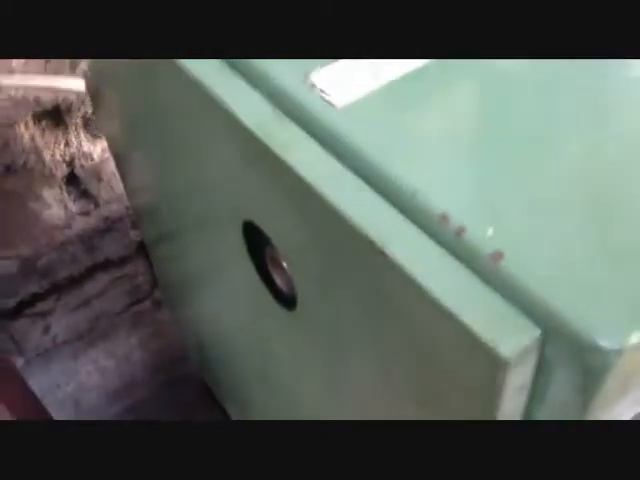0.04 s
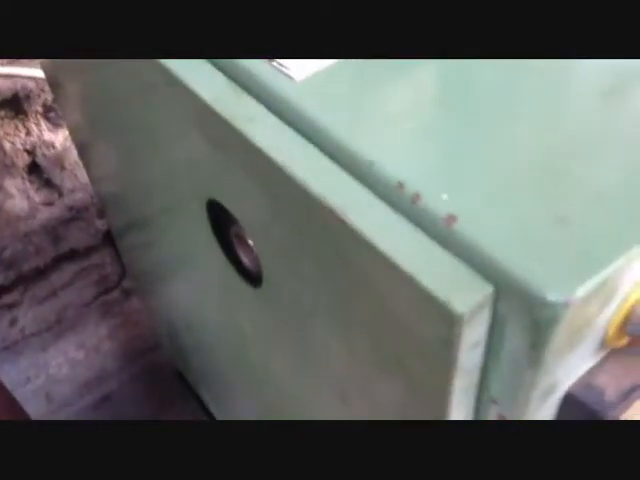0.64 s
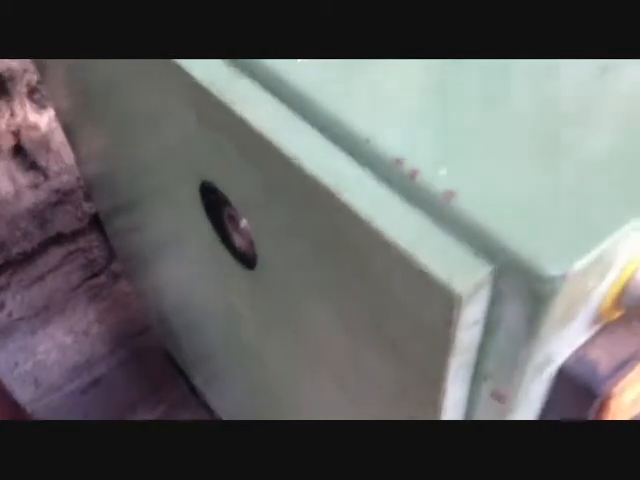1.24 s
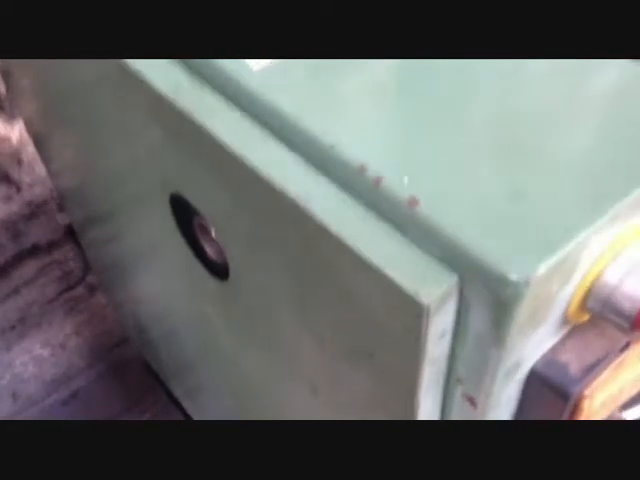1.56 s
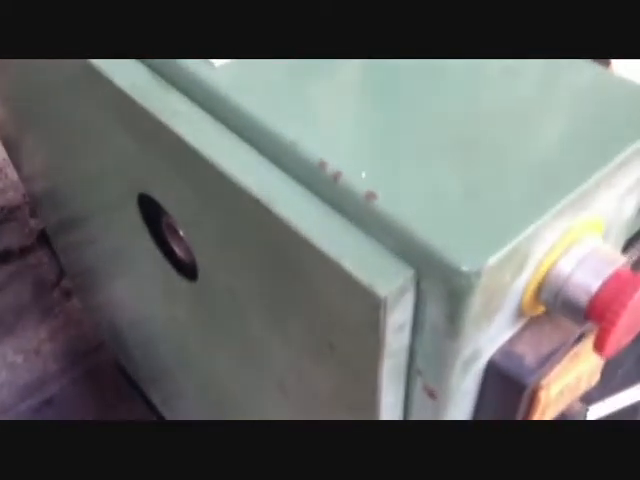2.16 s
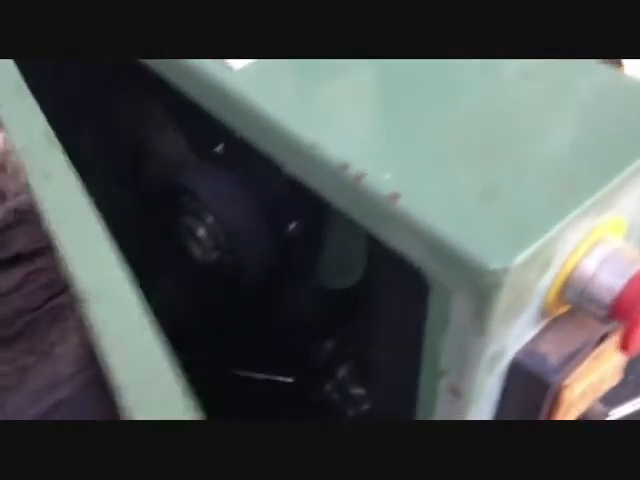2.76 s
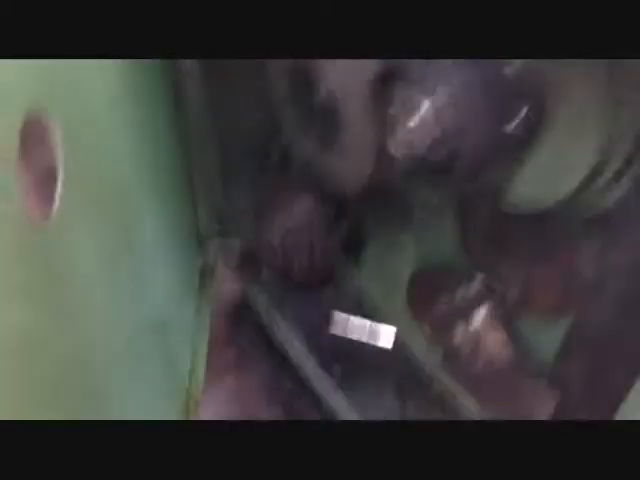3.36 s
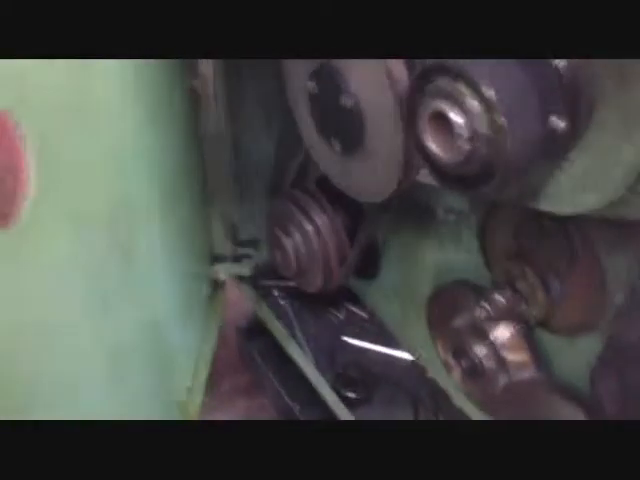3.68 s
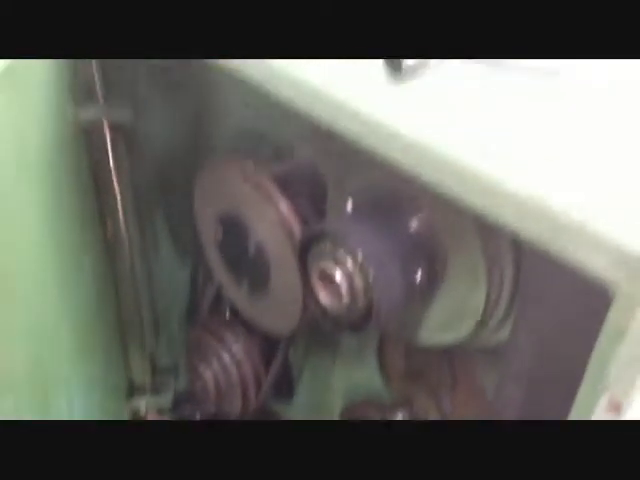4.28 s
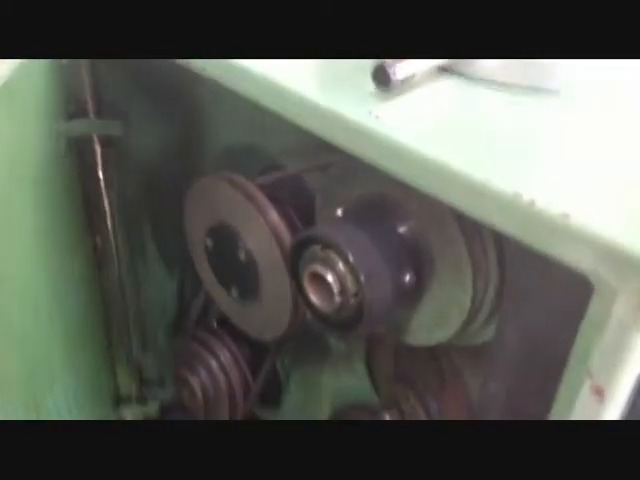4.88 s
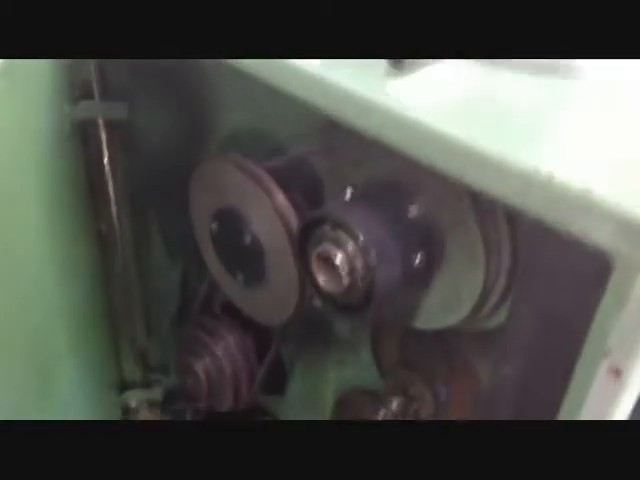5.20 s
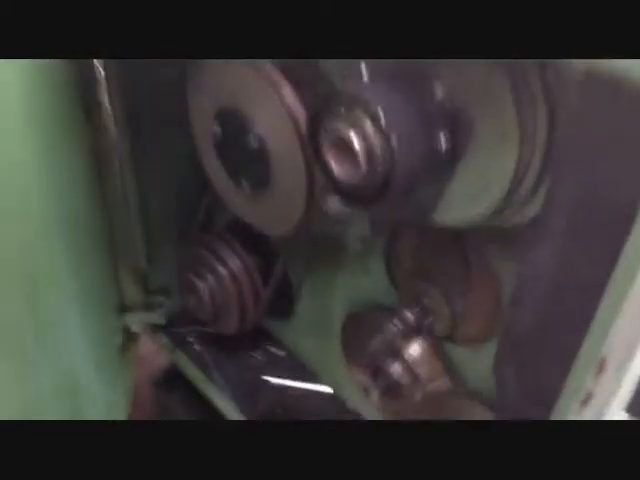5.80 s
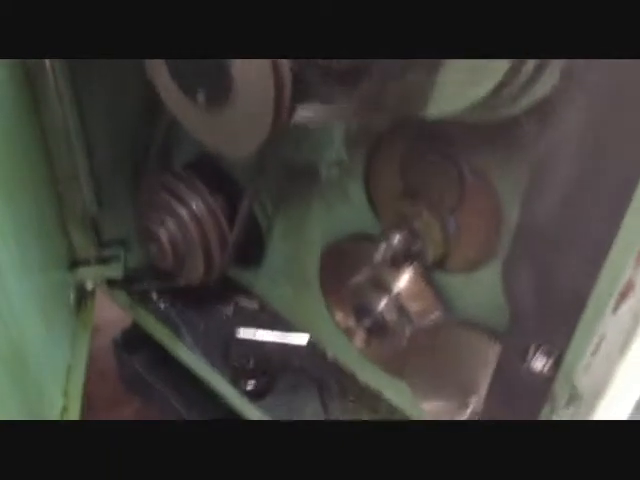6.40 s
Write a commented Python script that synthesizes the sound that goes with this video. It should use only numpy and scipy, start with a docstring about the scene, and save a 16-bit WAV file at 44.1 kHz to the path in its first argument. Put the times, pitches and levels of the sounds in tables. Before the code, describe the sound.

Sharp metal latch clicks and hollow knocks, a loud clack as an iron cabinet door opens, then a dull, bouncing thud in a quiet workshop.

```python
"""Over a low hum and hiss, a hand brushes paint and the steel catch of a machine cabinet clicks.
The heavy iron door is worked loose in a quiet workshop: at each tug the catch cracks and pings, and
the door booms in its low modes. The catch drags free with a loud clack; the door swings open and
judders against its hinge stop in ever quicker, weaker bounces. Faint chirps sound far off."""
import sys
import numpy as np
from scipy import signal
from scipy.fft import rfft, irfft, next_fast_len
from scipy.io import wavfile

SR = 44100
rng = np.random.default_rng(int(sys.argv[2]) if len(sys.argv) > 2 else 0)


def put_to_file(sound):
    """Save the sound as 16-bit audio at rate SR, in the file named by the first command-line argument."""
    columns = np.atleast_2d(sound).T  # one column per channel
    safe = np.clip(columns, -1, 1)
    whole_steps = np.round(safe * 32767)
    wavfile.write(sys.argv[1], SR, whole_steps.astype(np.int16))


N = 284445
RING_SIZE = 32768
TIME, RING_TIME = np.arange(N) / SR, np.arange(RING_SIZE) / SR

# room tone: (frequency [Hz], relative level [dB])
AIR_EQ = [(15, -47), (25, -12), (69, -20), (86, -18), (173, -1.5), (198, -12.5), (253, -4), (313, -17.5),
          (378, -12.5), (537, -19), (741, -21), (1410, -22), (1620, -22.5), (3340, -24.5), (15500, -31.5)]
# hum partials: (frequency [Hz], level [dB])
HUM_TONES = [(103, -75.5), (145, -69), (172, -67), (257, -74), (344, -76.5), (371, -83.5), (1373, -85),
             (1464, -82)]
# far chirps: (time [s], length [s], start pitch [Hz], end pitch [Hz], level [dB])
FAR_CHIRPS = [(0.356, 0.15, 3125, 3740, -69), (2.323, 0.22, 3800, 3080, -66.5),
              (3.379, .14, 3647, 3200, -66), (4.29, 0.2, 3730, 2985, -71.5),
              (5.952, 0.12, 3050, 3620, -68.5)]
# workshop reverb: (frequency [Hz], relative level [dB])
REVERB_EQ = [(100, -9.5), (200, -13), (450, -20), (750, -6), (1300, -16.5), (3000, -18.5), (6000, -19),
             (15000, -21)]
# decay of the reverb, the hard clang and the blunt clang: (frequency [Hz], t60 [s])
REVERB_DECAY = [(120, 0.93), (300, 1), (700, 0.36), (1500, 0.61), (3500, 0.41), (8000, 0.34), (15000, 0.22)]
HARD_DECAY = [(300, 0.15), (1000, 0.18), (2000, 0.15), (4000, 0.064), (8000, 0.12), (15000, 0.062)]
BLUNT_DECAY = [(150, 0.17), (700, 0.56), (1500, 0.26), (3000, 0.16), (10000, 0.27)]
# hand strokes: (time [s], length [s], level [dB])
HAND_STROKES = [(0.08, 0.25, -65.5), (0.926, 0.22, -67.5), (2.063, 0.22, -71), (3.017, 0.2, -67.5),
                (5.453, 0.42, -74)]
# tone of hand, drag, click, hard clang and blunt clang: (frequency [Hz], relative level [dB])
HAND_EQ = [(400, 22), (1500, -11), (3500, 13.5), (6000, 5), (9500, 9), (15000, -8)]
DRAG_EQ = [(500, 7), (2000, -4), (4000, -5), (7000, -2), (11000, -1), (15500, -16)]
CLICK_EQ = [(200, 3.5), (800, 8), (2000, -12), (3600, -11), (5200, -3), (6500, 1), (9500, -3),
            (12000, -10.5), (15500, -26)]
HARD_EQ = [(150, -15), (400, 8.5), (750, 3), (1000, -3), (1500, 0), (2300, -2), (3400, 0.5), (5000, -7.5),
           (6500, -21), (10000, -21.5), (15000, -73)]
BLUNT_EQ = [(70, -17), (140, 7), (300, 7.5), (700, -4), (1100, -8.5), (1700, -12), (2800, -14), (4200, -29),
            (7000, -40), (15000, -52)]
# modes of the catch, the latched door and the open door: (frequency [Hz], relative level [dB], t60 [s])
PING_MODES = [(1112, -8.5, .17), (1338, -6, 0.083), (1532, -2, 0.13), (1846, -1, 0.054), (2490, 3, 0.048),
              (2640, -25, 0.091), (2985, -6.5, 0.098), (3250, -5.5, 0.051), (3543, 2, 0.051),
              (3820, -3, 0.069), (4044, 0, 0.049), (4470, 7.5, 0.019), (5000, 3, 0.048), (5290, 0.5, 0.057)]
LATCHED_MODES = [(135.6, -19, 0.27), (177.5, -6, 0.16), (213, -6, 0.13), (266.8, -7, 0.19),
                 (294.3, -4, 0.15), (328.7, -8.5, 0.23), (377.6, -2, 0.17), (408.5, -15, 0.38),
                 (451.2, -1, 0.18), (463.6, -2.5, 0.15), (542, -19.5, 0.28), (598, -18.5, 0.23),
                 (630, -16, 0.27), (667, -19.5, 0.25), (709.8, -10, 0.15), (840, -25.5, 0.33),
                 (920, -26, 0.077), (1158, -26, 0.11)]
OPEN_MODES = [(131.8, -12, 0.45), (184.5, -11, .22), (237, -9, 0.12), (269, 0.5, 0.16), (310, -3, 0.2),
              (341, -5, 0.55), (445.3, -9.5, 0.78), (484, -18, .24), (526, -6.5, 0.44), (577, -8.5, 0.53),
              (606, -15, 0.22), (649, -9, 0.43), (707, -5.5, 0.23), (760, -13.5, 0.41), (770, -16, .34),
              (884, -17, 0.37), (1010, -15, 0.17), (1132, -2.5, 0.22), (1187, -8.5, 0.2), (1420, -18, 0.28),
              (1450, -16, 0.25), (1890, -32, 0.16), (2415, -16, 0.21), (2730, -26, 0.12)]
# the catch scrapes over its keeper: (time [s], length [s], level [dB], tilt [dB/octave])
CATCH_DRAGS = [(2.445, 0.02, -34, -.5), (2.485, 0.023, -33, 0.5)]
# catch contacts: (time [s], click [dB], clang [dB], clang tilt [dB/octave], favoured ping [Hz])
CATCH_HITS = [(0.430, -58.5, -61, 2, 5270), (0.6933, -38.5, -53.5, 2, 4340), (0.700, -43, -53, 5, 4370),
              (1.421, -38, -32, -2.5, 1800), (1.6303, -40.5, -38.5, -0.5, 3580),
              (1.721, -43.5, -37, -4.5, 3000), (1.7856, -51, -51.5, 4, 3250),
              (1.8207, -26.5, -33.5, -0.5, 3400), (1.8445, -40.5, -33, -3.5, 2400),
              (1.997, -58, -61, 7, 3260), (2.085, -56, -53.5, 5.5, 5400), (2.4424, -30.5, -36, -4, 5200),
              (2.4467, -27.5, -27.5, 5, 3500), (2.457, -33, -24.5, 4, 3200), (2.4645, -24, -24, 2, 2820),
              (2.4772, -25, -24.5, 3, 4470), (2.488, -31, -30, -0.5, 2470), (3.151, -59.5, -57, -6, 5170),
              (6.1458, -57.5, -63.5, 3, 4420)]
# the door jolts on its hinges: (time [s], level [dB], favoured frequency [Hz], boost there [dB])
DOOR_JOLTS = [(0.440, -58.5, 330, -2), (0.7053, -36.5, 199, 7.5), (1.402, -48, 390, 8),
              (1.429, -35, 350, 2), (1.507, -47.5, 353, 8), (1.633, -24.5, 260, 6.5), (1.669, -35, 440, 24),
              (1.7204, -29.5, 377, 5.5), (1.79, -28, 229, 7.5), (1.829, -19.5, 546, 11),
              (2.445, -23.5, 380, 4.5), (2.4573, -17, 340, 1.5), (2.508, -29, 255, 13),
              (2.924, -61, 950, 35), (3.127, -45, 252, 15.5), (6.125, -63.5, 806, 20)]
# the open door meets its stop: (time [s], ring [dB], clang [dB], favoured frequency [Hz])
STOP_HITS = [(3.629, -46.5, -50.5, 362), (3.819, -51.5, -48, 352), (3.849, -25.5, -25.5, 636)]


def from_db(db):
    return 10 ** (np.asarray(db) / 20)


def rms(x):
    return np.sqrt(np.mean(x ** 2) + 1e-20)


def at_hz(points, hz):
    """Read a table on a log-frequency axis."""
    f, value = np.transpose(points)
    return np.interp(np.log(np.maximum(hz, 1)), np.log(f), value)


def add(out, s, sound):
    """Mix a sound in at time s."""
    i = max(round(s * SR), 0)
    out[i:i + len(sound)] += sound[:N - i]


def at_level(sound, db, size):
    """Scale a sound so that its first `size` samples have the given rms level."""
    return sound * from_db(db) / rms(sound[:size])


def drift(rate):
    """Random modulator that glides to a new value `rate` times a second."""
    knots = rng.standard_normal(N // 100)
    return np.interp(TIME * rate, np.arange(len(knots)), knots)


def colour(x, eq, tilt_db=0):
    """Minimum-phase EQ, tilted per octave: nothing rings ahead of an attack."""
    size = 2 * next_fast_len(len(x) // 2 + 2048)
    hz = np.maximum(np.fft.rfftfreq(size, 1 / SR), 20)
    gain = from_db(at_hz(eq, hz) + tilt_db * np.log2(hz / hz.mean()))
    cepstrum = irfft(np.log(gain))
    cepstrum[1:size // 2] *= 2
    cepstrum[size // 2 + 1:] = 0
    return irfft(rfft(x, size) * np.exp(rfft(cepstrum)))[:len(x)]


def dying_noise(decay, size=16384):
    """Countless modes struck at once; each band dies at its own rate."""
    white, hz = rfft(rng.standard_normal(size)), np.fft.rfftfreq(size, 1 / SR)
    centres, t60s = np.transpose(decay)
    shares = [at_hz(np.c_[centres, row], hz) for row in np.eye(len(centres))]
    bands = [irfft(white * share, size) for share in shares]
    return sum(band * from_db(-60 * RING_TIME[:size] / t60) for band, t60 in zip(bands, t60s))


def ring(modes, favoured_hz, boost_db, octaves=0.39, scatter_db=1.0, split=0.0238, twin_db=-5):
    """One blow: the point of contact favours some modes; each beats with a weaker twin close by."""
    hz, db, t60 = np.transpose(modes)[:, :, None]
    nearness = np.exp(-(np.log2(hz / favoured_hz) / octaves) ** 2)
    strength = from_db(db + boost_db * nearness + scatter_db * rng.standard_normal(hz.shape))
    twin_hz = hz * (1 + split * rng.uniform(-1.12, 1, hz.shape))
    main, twin = (np.sin(2 * np.pi * (f * RING_TIME + rng.random(hz.shape))) for f in (hz, twin_hz))
    fade = from_db(-60 * RING_TIME / t60)
    return np.sum(strength * fade * (main + from_db(twin_db) * twin), axis=0)


def room_tone(air_db=-61, waver_db=4.0, wander_hz=1.92):
    """A bed of air and hiss, with the wavering hum of something running far off."""
    out = at_level(colour(rng.standard_normal(N), AIR_EQ), air_db, N)
    for hz, db in HUM_TONES:
        phase = 2 * np.pi * np.cumsum(hz + wander_hz * drift(9.3)) / SR
        out += np.sqrt(2) * from_db(db + waver_db * drift(6.4)) * np.sin(phase)
    return out


def chirps(waver_hz=120, smear_t60=0.12, upper_ratio=1.2, upper_db=-6):
    """Short wavering glides with a weaker upper tone, smeared by distance."""
    out = np.zeros(N)
    for s, length, start_hz, end_hz, db in FAR_CHIRPS:
        size = int(length * SR)
        pitch = np.linspace(start_hz, end_hz, size) + waver_hz * drift(402)[:size]
        phase = 2 * np.pi * np.cumsum(pitch) / SR
        tones = np.sin(phase) + from_db(upper_db) * np.sin(upper_ratio * phase)
        smear = rng.standard_normal(RING_SIZE) * from_db(-60 * RING_TIME / smear_t60)
        far = signal.fftconvolve(tones * signal.windows.tukey(size, 0.5), smear)
        add(out, s, at_level(far, db, size))
    return out


def workshop(x, build_s=0.013, wet_db=-6):
    """Diffuse reflections bloom and die away, the lows last."""
    bloom = 1 - np.exp(-(RING_TIME / build_s) ** 2)
    tail = bloom * dying_noise(REVERB_DECAY, RING_SIZE)
    tail = colour(tail / np.linalg.norm(tail), REVERB_EQ)
    return x + from_db(wet_db) * signal.fftconvolve(x, tail)[:N]


def hand_brushes(grain_db=3.0):
    """Skin on paint: a soft, grainy swish."""
    out = np.zeros(N)
    for s, length, db in HAND_STROKES:
        size = int(length * SR)
        swish = rng.standard_normal(size) * np.hanning(size)
        grain = from_db(grain_db * drift(86)[:size])
        add(out, s, at_level(colour(swish * grain, HAND_EQ), db, size))
    return out


def catch_drag(slips_per_s=2000, fade_share=0.73):
    """The catch sticks and slips in a gritty run of tiny uneven clicks."""
    out = np.zeros(N)
    for s, length, db, tilt_db in CATCH_DRAGS:
        size = int(length * SR)
        slips = rng.standard_normal(RING_SIZE) * (rng.random(RING_SIZE) < slips_per_s / SR)
        grit = colour(slips, DRAG_EQ, tilt_db)[:size]
        add(out, s, at_level(grit, db, size) * signal.windows.tukey(size, fade_share))
    return out


def crack(spike=3.5, snap_t60=0.013, echo_t60=0.071, echo_db=-11):
    """The catch's attack: a spike and a short snap, then weaker echoes off the cabinet."""
    t = RING_TIME[:4096]
    envelope = from_db(-60 * t / snap_t60) + from_db(echo_db - 60 * t / echo_t60)
    burst = rng.standard_normal(len(t)) * envelope
    burst[0] = spike
    return colour(burst, CLICK_EQ)


def catch_hits(ping_below_click_db=6.5):
    """Steel on iron: a crack, the ping of the catch and the clang of the door's crowded upper modes."""
    out = np.zeros(N)
    for s, click_db, clang_db, tilt_db, ping_hz in CATCH_HITS:
        ping = ring(PING_MODES, ping_hz, boost_db=8, octaves=0.25)
        clang = colour(dying_noise(HARD_DECAY), HARD_EQ, tilt_db)
        add(out, s, at_level(crack(), click_db, size=130))
        add(out, s, at_level(ping, click_db - ping_below_click_db, size=440))
        add(out, s, at_level(clang, clang_db, size=440))
    return out


def door_booms(swell_s=0.0031):
    """At each jolt the heavy door takes a moment to get moving, then booms in its low modes."""
    out = np.zeros(N)
    swell = 1 - np.exp(-(RING_TIME / swell_s) ** 2)
    for s, db, favoured_hz, boost_db in DOOR_JOLTS:
        boom = swell * ring(LATCHED_MODES, favoured_hz, boost_db)
        add(out, s, at_level(boom, db, size=1100))
    return out


def door_judder(contact_s=0.00059, bounces=6, first_gap_s=0.036, gap_ratio=0.93):
    """Blunt bounces on the hinge stop, each sooner and weaker; unlatched, the door rings longer."""
    ring_loss_db, clang_loss_db = 4.5, 5.5   # per bounce
    rebound_hz = 300   # every other bounce favours the low modes
    out = np.zeros(N)
    attack = 1 - np.exp(-RING_TIME / contact_s)
    for s, ring_db, clang_db, favoured_hz in STOP_HITS:
        for k in range(bounces):
            body = attack * ring(OPEN_MODES, rebound_hz if k % 2 else favoured_hz, boost_db=9)
            clang = colour(dying_noise(BLUNT_DECAY), BLUNT_EQ, tilt_db=1.0)
            add(out, s, at_level(body, ring_db - k * ring_loss_db, size=1100))
            add(out, s, at_level(clang, clang_db - k * clang_loss_db, size=440))
            s += first_gap_s * gap_ratio ** k
    return out


def scene():
    """Mono mix: the door in the workshop's reverb, the hand, far chirps and room tone."""
    door = catch_hits() + catch_drag() + door_booms() + door_judder()
    # the door is too small to radiate deep bass
    door = signal.sosfilt(signal.butter(3, 100, "high", fs=SR, output="sos"), door)
    return (workshop(door) + hand_brushes() + chirps() + room_tone())[None]


def record(dry, low_cut_hz=55, high_cut_hz=15500):
    """The small microphone loses the deep bass; the top is cut steeply."""
    thin = signal.sosfilt(signal.butter(2, low_cut_hz, "high", fs=SR, output="sos"), dry)
    return signal.sosfilt(signal.ellip(12, 0.1, 80, high_cut_hz, fs=SR, output="sos"), thin)


dry = scene()
out = record(dry)
put_to_file(out)
```